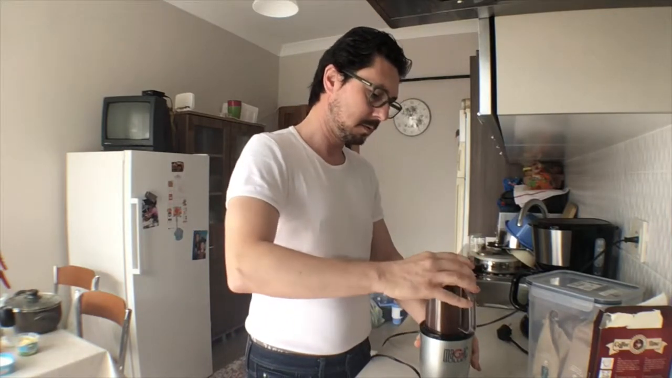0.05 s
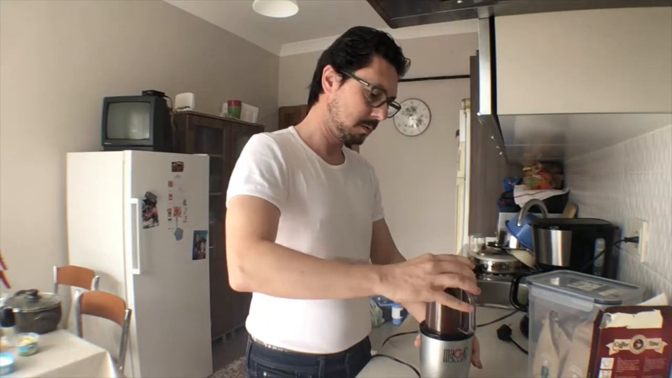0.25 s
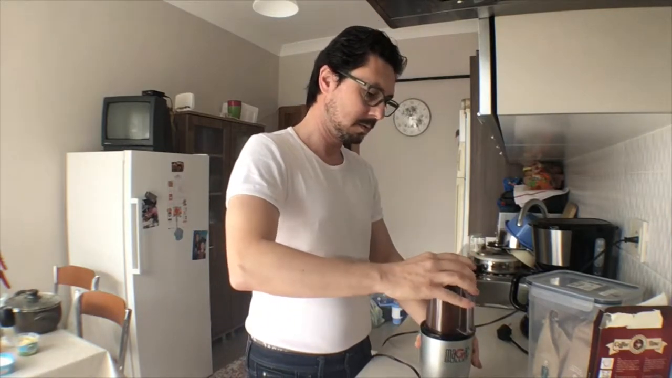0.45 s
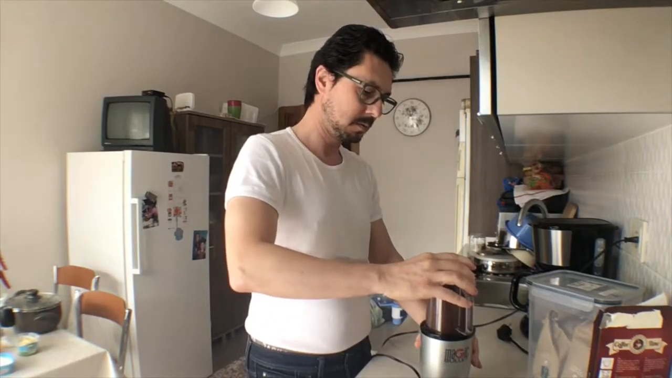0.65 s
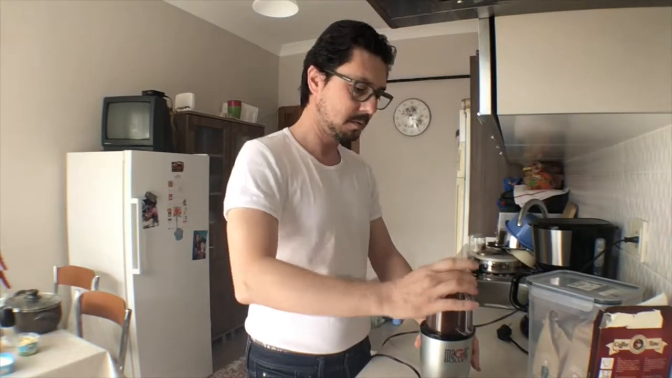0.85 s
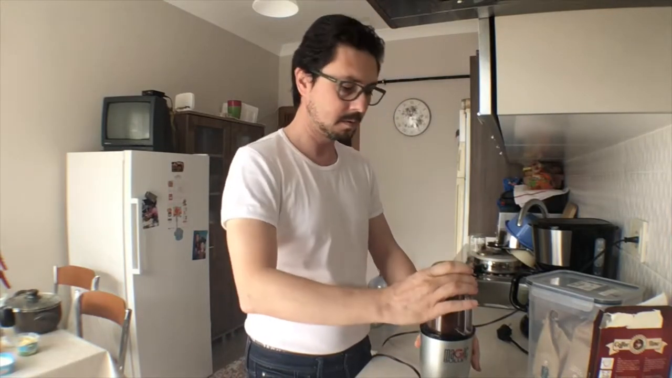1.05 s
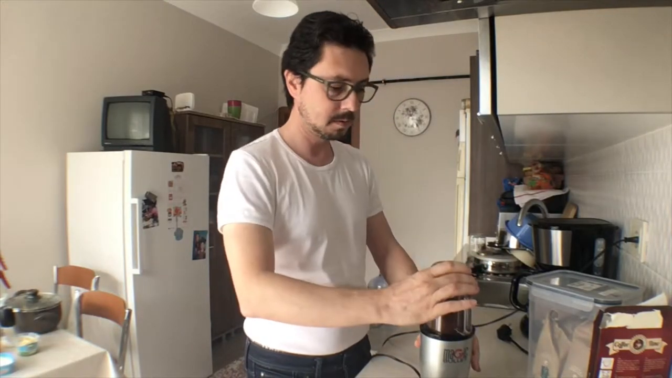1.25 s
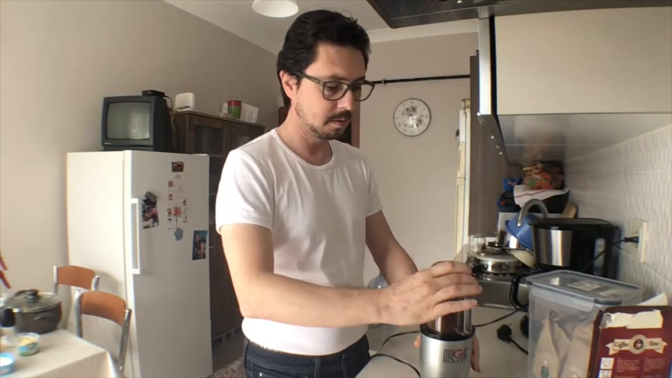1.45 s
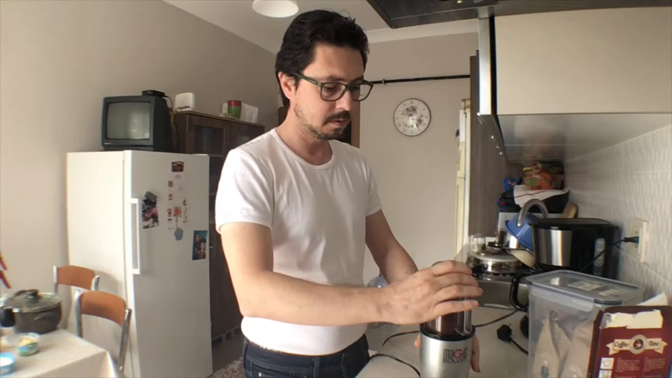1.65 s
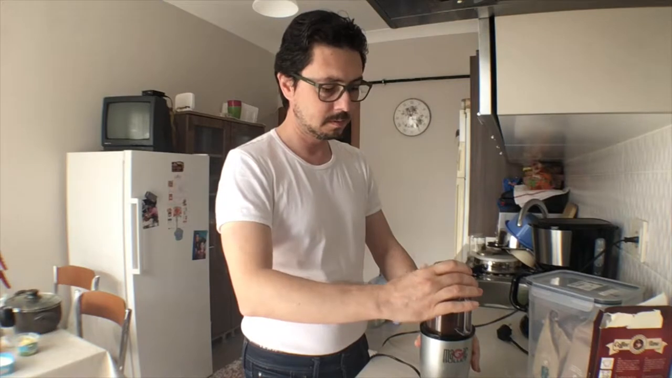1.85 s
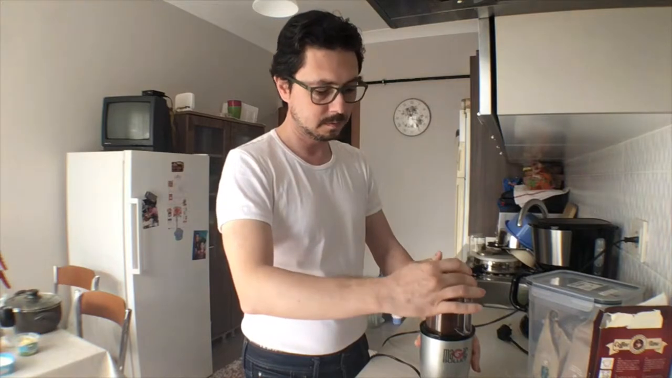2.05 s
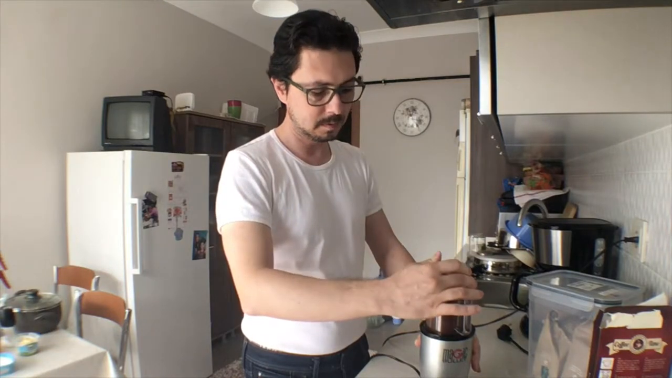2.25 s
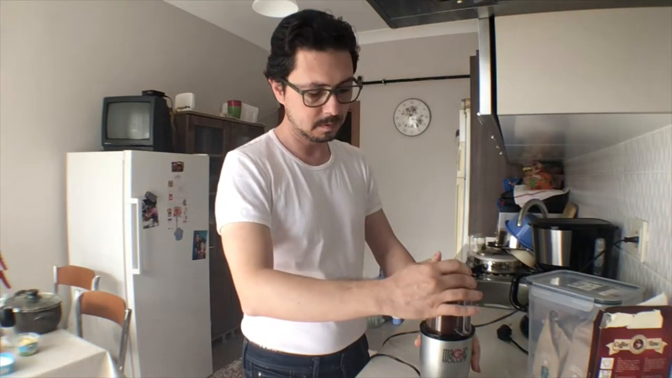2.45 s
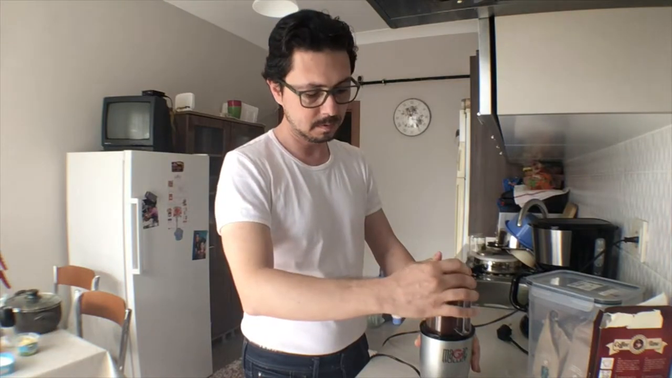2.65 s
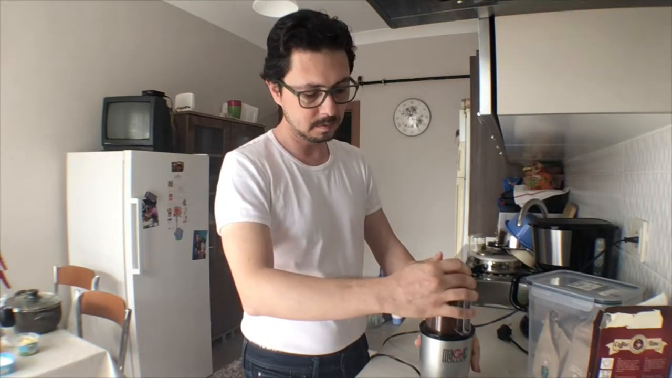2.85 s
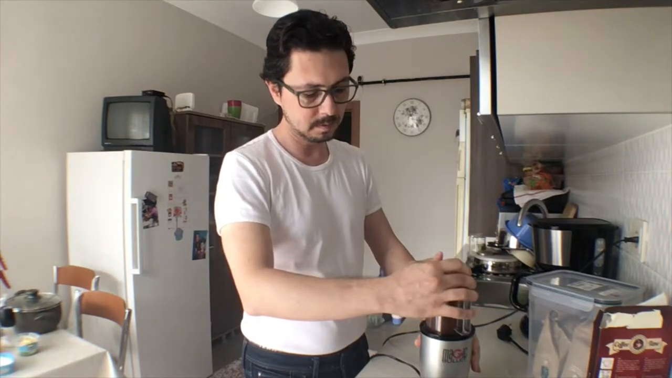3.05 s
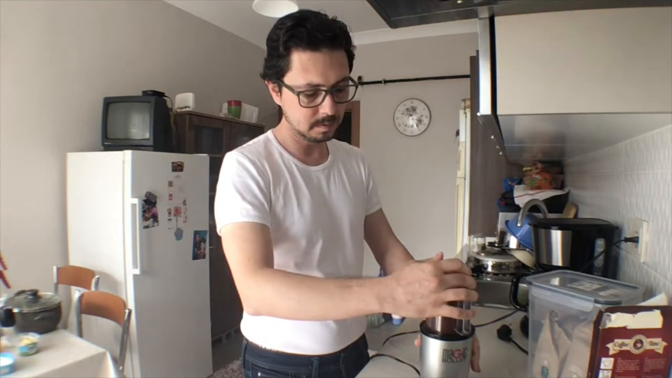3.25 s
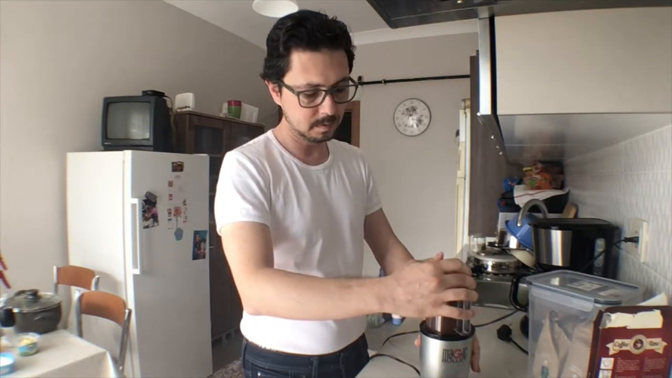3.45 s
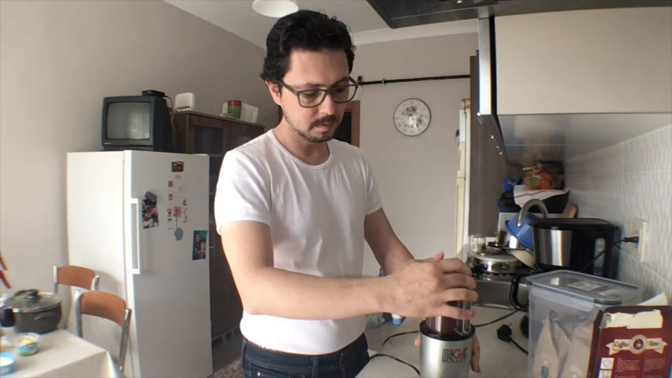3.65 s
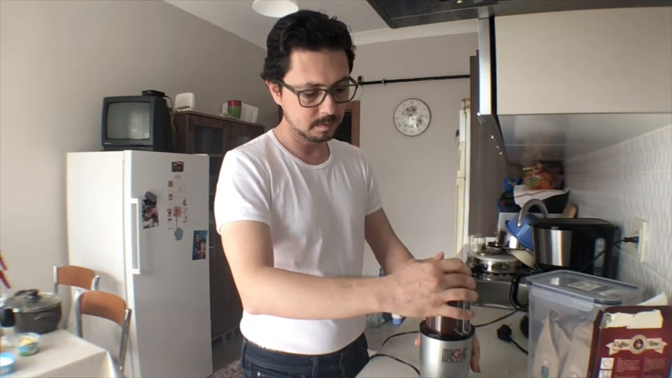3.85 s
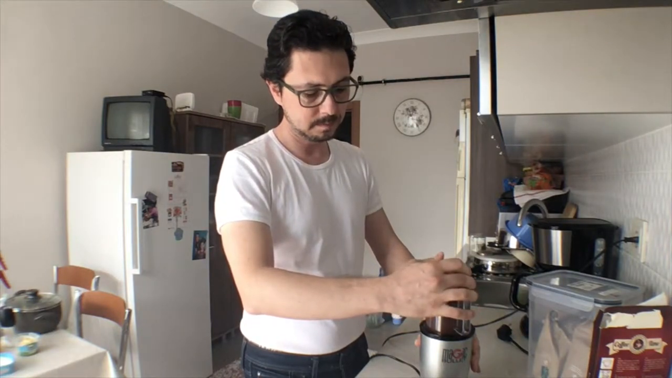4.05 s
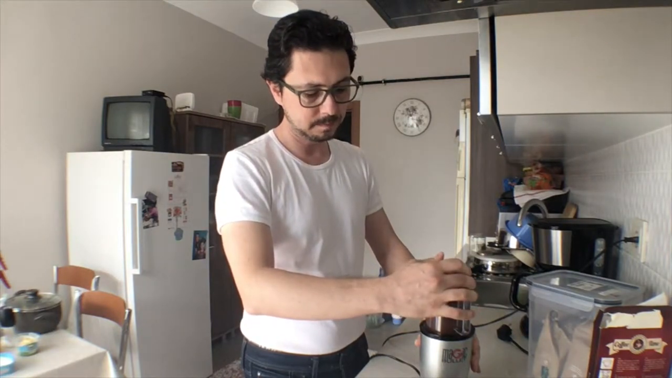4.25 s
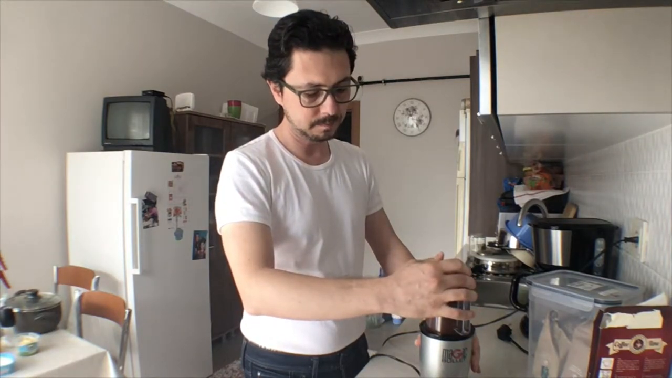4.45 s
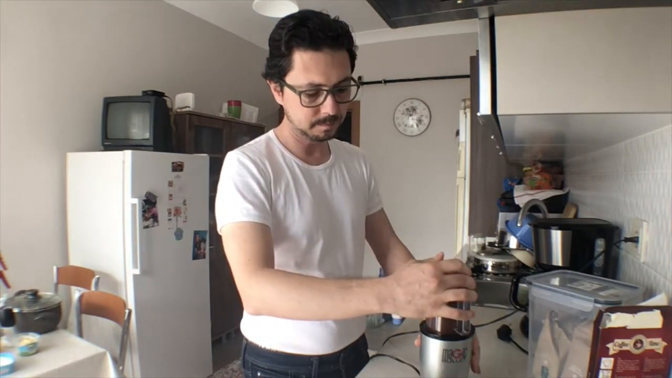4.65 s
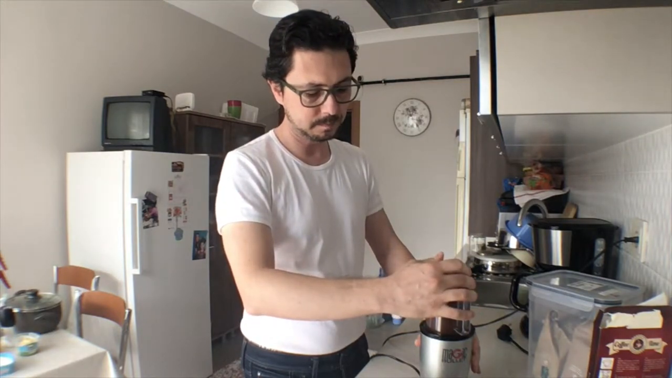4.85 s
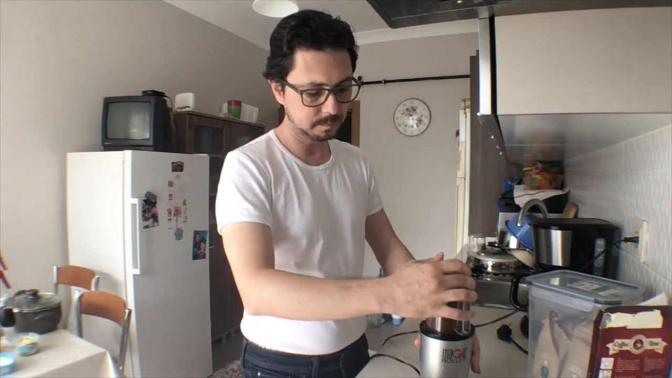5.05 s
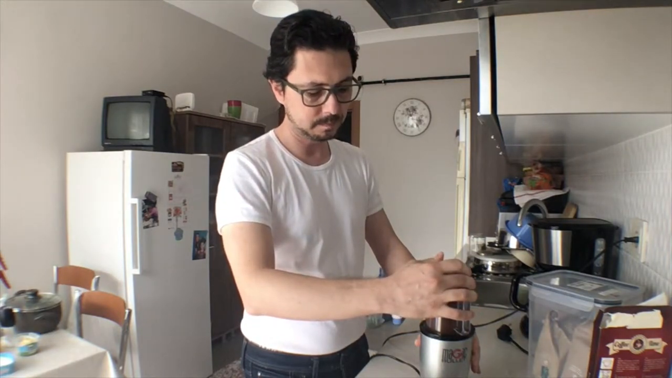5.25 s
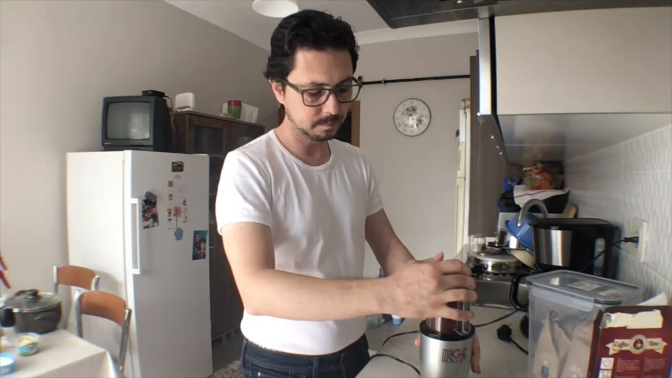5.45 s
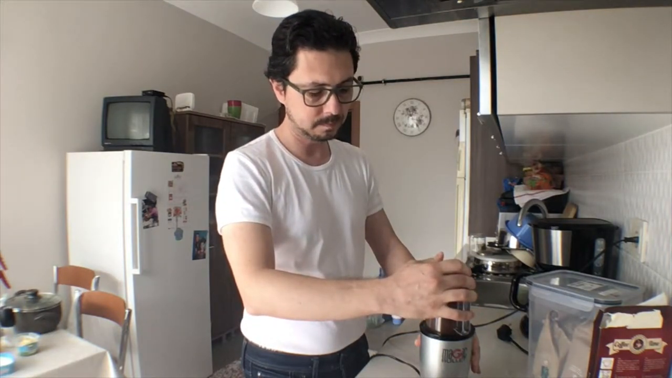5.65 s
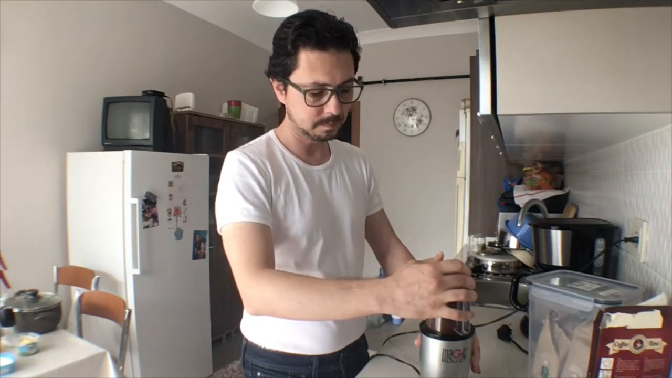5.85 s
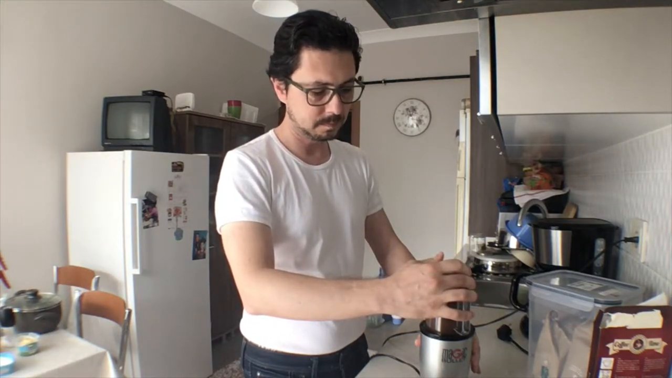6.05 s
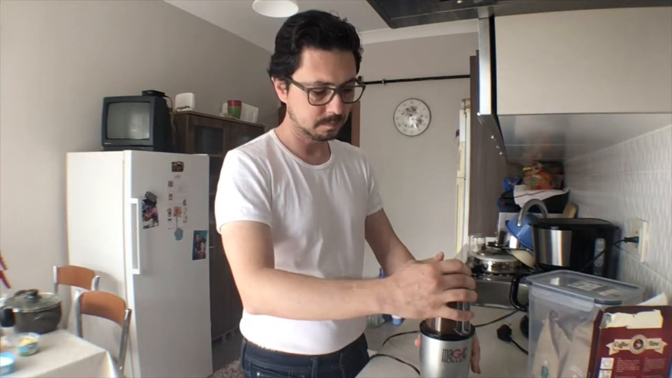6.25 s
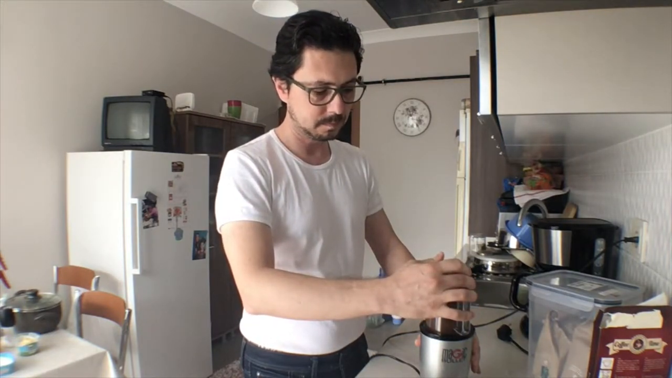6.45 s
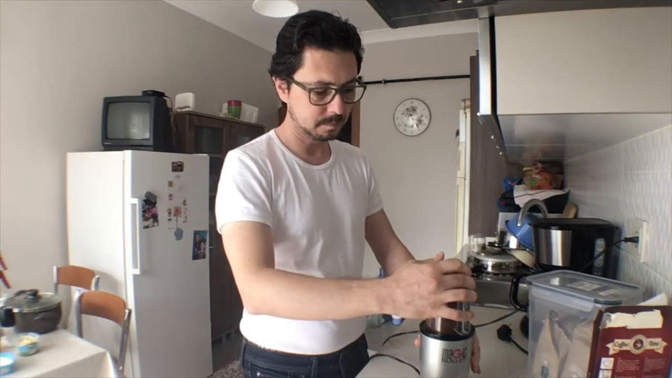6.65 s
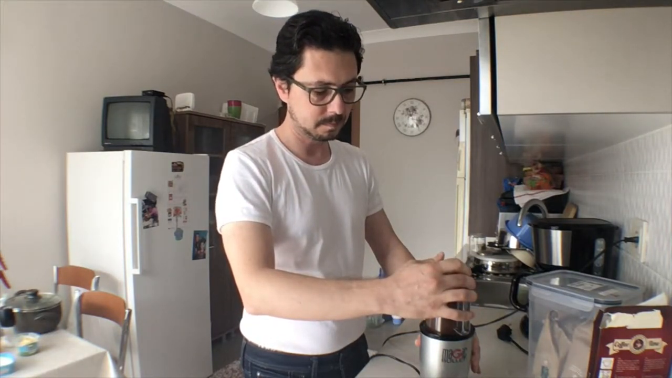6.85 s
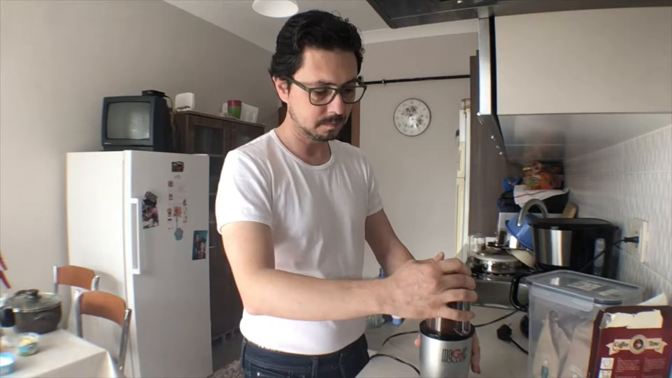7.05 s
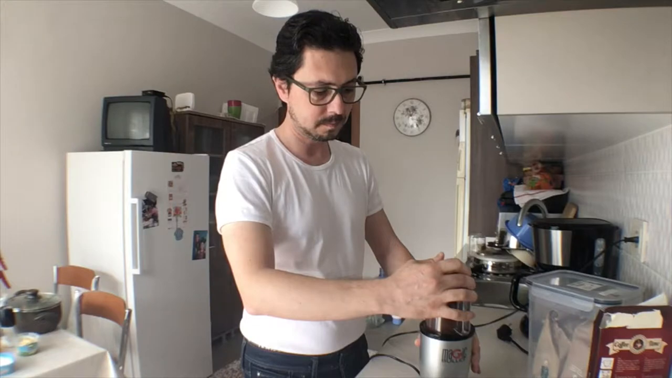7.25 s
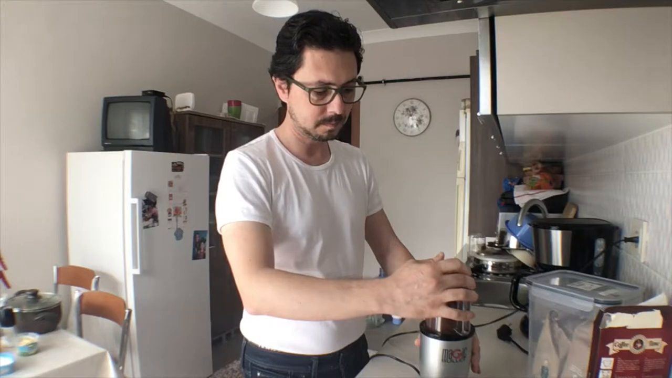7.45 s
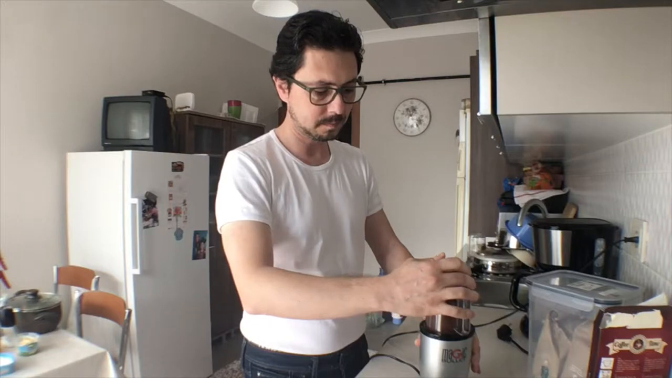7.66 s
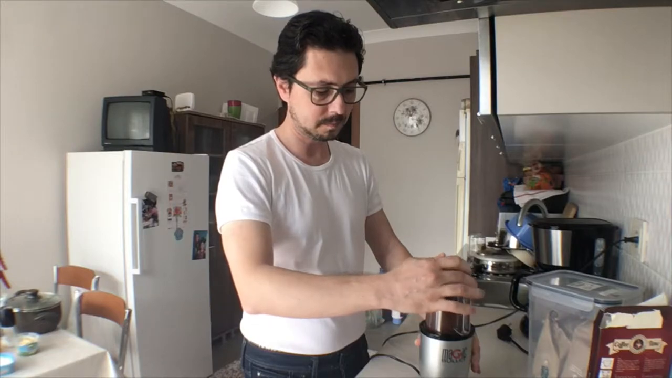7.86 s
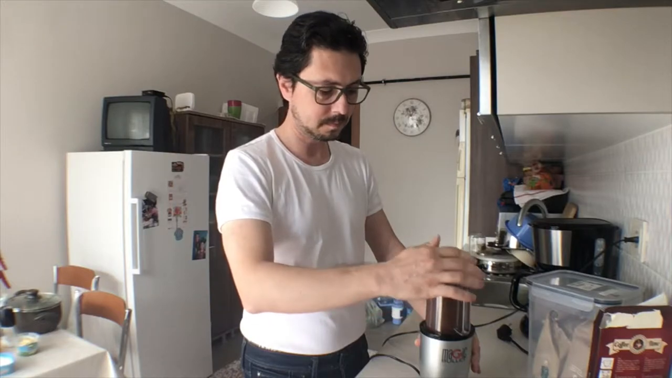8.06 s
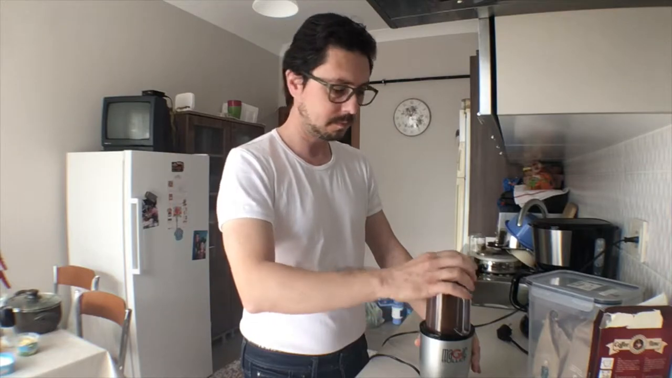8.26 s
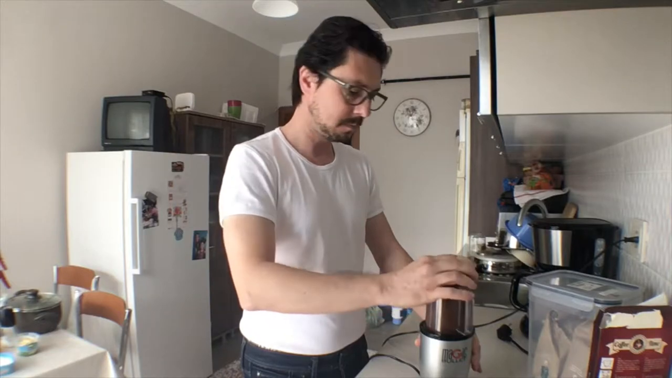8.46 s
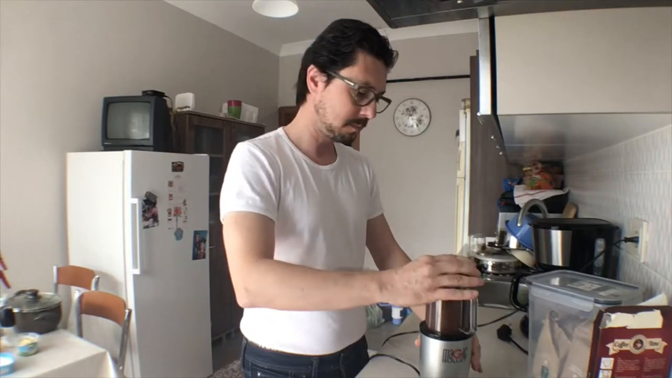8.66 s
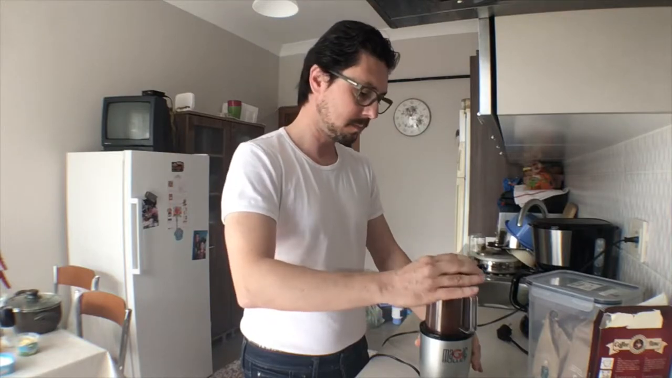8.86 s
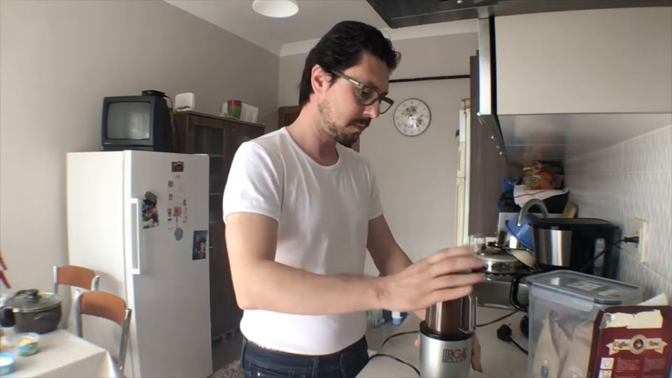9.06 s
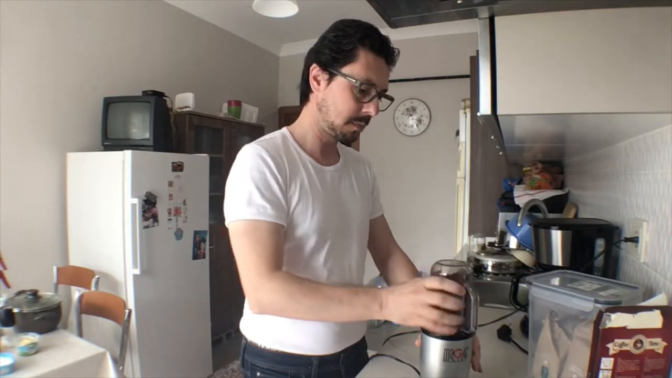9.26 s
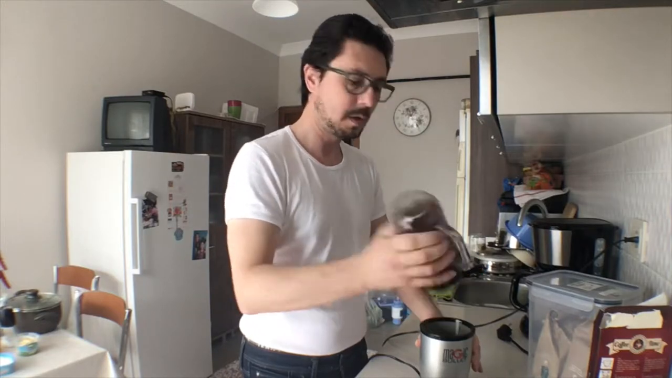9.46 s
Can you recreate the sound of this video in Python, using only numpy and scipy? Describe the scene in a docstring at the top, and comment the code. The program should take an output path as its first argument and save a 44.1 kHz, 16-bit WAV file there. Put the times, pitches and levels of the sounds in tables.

```python
"""A small blender grinds coffee beans in a plastic cup on a kitchen counter.
The switch knocks and the motor is nudged once; from 0.3 s it is held on, humming and shaking its base.
The blades shatter the beans: chips rattle in bursts, grit hisses round the wall and rings the steel.
The crunch of whole beans thins as they break. At 8.8 s the power goes off and the rotor coasts
to a stop. Last, the cup is twisted off, its lugs knocking on the base."""
import sys
import numpy as np
from scipy import signal
from scipy.fft import rfft, irfft
from scipy.io import wavfile
from scipy.ndimage import uniform_filter1d

SR = 44100
rng = np.random.default_rng(int(sys.argv[2]) if len(sys.argv) > 2 else 0)


def unload_wav(signal):
    """Save mono or channel-first audio to the path in sys.argv[1] as 16-bit WAV at rate SR, clipped to [-1, 1]."""
    wavfile.write(
        sys.argv[1],
        SR,
        np.round(np.clip(np.atleast_2d(signal).T, -1, 1) * 32767).astype(np.int16),
    )


N = 419390

# large pieces shattering: (time [s], level [dB], ping pitch [Hz], decay [s])
LARGE_CRACKS = [(0.329, -25.5, 3630, 0.012), (0.3674, -18.5, 2450, 0.014), (0.4644, -20, 3970, 0.0099),
                (0.5044, -16, 2980, 0.012), (0.7074, -15.5, 2680, 0.012), (0.8764, -17, 4460, 0.014),
                (1.0814, -22, 2090, 0.012), (1.1672, -17, 2067, 0.009), (1.2614, -21, 3690, 0.0099),
                (1.6437, -15.5, 4220, 0.016), (1.8827, -18, 1870, 0.022), (2.1435, -15.5, 2053, 0.0091),
                (2.2223, -20, 1880, 0.0092), (2.3414, -18.5, 2680, 0.012), (2.4237, -19.5, 2300, 0.014),
                (2.7462, -21, 3970, 0.012), (2.9861, -18, 2463, 0.012), (3.045, -15, 2556, 0.015),
                (3.1123, -16, 2040, 0.0085), (3.323, -20, 2060, 0.011), (3.4974, -17.5, 2620, 0.011),
                (3.6562, -16, 1860, 0.012), (3.6784, -16, 2080, 0.025), (4.0857, -16.5, 2590, 0.013),
                (4.464, -17, 2970, 0.012), (4.571, -16, 4100, 0.012), (4.7631, -20, 1910, 0.0098),
                (4.816, -19, 3650, 0.012), (4.8864, -18, 1850, 0.011), (4.9944, -17, 2670, 0.015),
                (5.2206, -19, 1870, 0.011), (5.2984, -19, 1930, 0.011), (5.463, -16, 2064, 0.02),
                (5.5679, -14.5, 2460, 0.012), (5.7823, -16.5, 3680, 0.012), (5.9549, -18, 1940, 0.013),
                (6.003, -20, 2680, 0.013), (6.135, -17, 2656, 0.012), (6.2857, -16.5, 2403, 0.012),
                (6.4467, -16.5, 2080, 0.012), (6.5364, -17, 3210, 0.013), (6.8997, -22, 1900, 0.012),
                (7.1296, -18, 2110, 0.013), (7.253, -13, 1870, 0.011), (7.2996, -17, 2580, 0.011),
                (7.5055, -19, 2680, 0.012), (7.5978, -23, 3650, 0.011), (7.886, -16, 1850, 0.012),
                (7.9808, -19.5, 3670, 0.013), (8.098, -18.5, 1833, 0.013), (8.4928, -13.5, 2120, 0.0093),
                (8.7787, -26, 1820, 0.0085)]
# load thrown by the nudge: (time [s], chips [dB], grit [dB])
NUDGE_LEVELS = [(0, -44, -54), (.021, -50.5, -61), (.026, -37.5, -40), (.042, -29.5, -41.5),
                (.06, -41, -48), (.1, -55, -73), (.16, -73, -80), (.27, -87, -97)]
# crackle from beans still whole: (time [s], share [0-1])
WHOLE_SHARE = [(0, 0.5), (.35, 0.5), (.44, 1), (.55, 0.75), (.8, 0.7), (1.1, 0.34), (1.8, 0.2), (3, 0.16)]
# contact spectra: (frequency [Hz], level [dB])
CHIP_SPECTRUM = [(200, -31), (500, -16), (800, -5.5), (1600, -2.5), (2000, 3.5), (2800, 0.5), (4200, 1),
                 (5500, -0.5), (7000, -4), (10000, -7.5), (16000, -20.5)]
GRIT_SPECTRUM = [(200, -27), (550, -3), (1000, -1.5), (2200, -1), (4000, -3.5), (5000, 0.5), (5750, -1),
                 (7300, 1), (7700, 1), (9300, 0), (10450, -6), (11400, 2), (12300, -0.5), (13000, -2),
                 (16000, -7.5)]
CRUNCH_SPECTRUM = [(300, -32), (900, -10.5), (2000, -5.5), (2900, 0), (4500, 0), (5700, -7), (7000, 0),
                   (8600, 3.5), (9600, 1), (10700, -6), (12000, 2.5), (13200, -7), (16000, -7)]
KNOCK_SPECTRUM = [(50, -1.5), (120, 4), (220, -13.5), (350, -1.5), (900, -8.5), (2000, -13.5), (4000, -17),
                  (8000, -19), (16000, -27)]
SCRAPE_SPECTRUM = [(300, -14), (2000, 9), (4000, 10), (6500, -11), (8500, 8), (11000, -4), (16000, -9)]
# cup and housing resonances: (frequency [Hz], width [Hz], lift [dB])
CUP_MODES = [(301.5, 51, 3.5), (430.5, 44, 7), (463, 19, 6.5), (638, 38, 6), (707, 29, 7.5), (849, 28, 7.5),
             (1093, 74, 4.5), (1225, 70, 6), (1390, 51, 3), (1802, 64, 3), (1883, 95, 7.5), (2070, 72, 5),
             (2130, 64, 2.5), (2445, 120, 7), (2659, 86, 8.5), (2980, 112, 7), (3180, 74, 4),
             (3460, 18, 10), (3705, 90, 8), (4054, 86, 6), (4390, 260, 4.5), (4975, 64, 7.5),
             (5360, 110, 2.5), (5850, 80, 4.5), (6180, 90, 8.5), (6410, 70, 7.5), (6860, 122, 11),
             (7070, 79, 5.5), (7690, 87, 5)]
# steel blade bending modes: (frequency [Hz], width [Hz], level [dB])
BLADE_LOW_MODES = [(5165, 80, -1), (5268, 60, 0)]
BLADE_HIGH_MODES = [(6430, 130, -2), (6655, 130, 0)]
# blade ring re grit; whole beans strike hardest: (time [s], low pair [dB], high pair [dB])
BLADE_LEVELS = [(0, -20, -22), (.33, -5, -16), (.45, -12, -8), (.58, -3, -3), (.8, -5, -1), (1, -3.5, -7.5),
                (8.1, -6, -11), (8.6, -1.5, -15), (9.0, -3, -1.5)]
# rotor spins up, races as the beans give way, steadies, coasts: (time [s], speed [rev/s])
ROTOR_SPEED = [(.33, 50), (.5, 115), (.59, 140), (.69, 160), (.82, 158), (1.0, 169), (1.2, 172), (1.5, 168),
               (2.0, 158), (3.2, 156.5), (8.2, 160), (8.77, 151), (8.95, 145)]
# hum orders 1-3: (balanced level [dB], gain at full wobble [dB])
HUM_ORDERS = [(-62.5, 19), (-61, 12), (-57, 10.5)]
# housing resonances lifting a passing order: (frequency [Hz], width [Hz], lift [dB])
MOUNT_MODES = [(339, 28, 13), (470, 14, 4.5)]
# beans lodged on one side: (start [s], end [s], strength [0-1])
WOBBLE_SPANS = [(0.562, .83, 0.94), (8.735, 8.89, 0.45)]
# switch-on surges: (time [s], buzz level [dB])
INRUSH_SURGES = [(.024, -42), (0.329, -43)]
# switch, stopping blades, cup on base: (time [s], level [dB], relative treble [dB])
KNOCK_EVENTS = [(.024, -29, -2), (0.276, -41.5, -8), (.29, -55, -15), (.316, -35, -4), (9.143, -43, -8.5),
                (9.372, -41, -10), (9.378, -51, -12), (9.387, -49, -9), (9.398, -43.5, -1),
                (9.412, -52, -12), (9.435, -52, -12), (9.448, -48, -3)]
# spectra of housing, counter and still kitchen: (frequency [Hz], level [dB])
HOUSING_SPECTRUM = [(150, -27.5), (250, -14.5), (300, -3.5), (380, 0.5), (475, -5), (510, -13),
                    (800, -11.5), (2000, -36.5), (12000, -74.5)]
COUNTER_SPECTRUM = [(25, -28), (40, -20), (48, -12), (55, -13), (63, -1), (74, 0), (89, -7), (102, -2),
                    (130, -7), (185, -10), (225, -5), (300, -15), (700, -40), (8000, -90)]
AIR_SPECTRUM = [(25, -27), (60, -3.5), (105, 4.5), (170, -16), (350, -9.5), (700, -16.5), (2000, -34),
                (6000, -41), (16000, -37)]

ON_S, OFF_S, SETTLE_S = 0.3245, 8.79, 8.966
BITE_S, BITE_RISE_S = 0.398, 0.052  # blades draw the beans in
CRUISE_HZ, MAINS_HZ = 155, 50
PING_WIDTH_HZ, PING_DB = 70, -21
KITCHEN_T60_S, CUTOFF_HZ = 0.29, 15800


def beans():
    """Chips clatter in clumps, whole beans crunch, grit streams round the wall and rings the blades."""
    chip_level, grit_level = thrown()
    whole = np.clip(in_time(WHOLE_SHARE)[0], 0, 1)
    clumps = from_db(-2 - 1.3 * whole + 1.75 * drift(28))
    chips = chip_level * clumps * impacts(per_s=4500, spread_db=2)
    grit = grit_level * from_db(-1.5 + 1.07 * drift(24)) * impacts(per_s=10500, spread_db=2.5)
    snaps = grit_level * impacts(per_s=9000, spread_db=2.5)
    coarse = body(chips + shattering(split_hz=2900), CHIP_SPECTRUM, CUP_MODES, band_hz=(1700, 4500))
    fine = body(grit * np.sqrt(1 - whole), GRIT_SPECTRUM, CUP_MODES, band_hz=(7500, 15000))
    crunch = body(snaps * np.sqrt(whole), CRUNCH_SPECTRUM, band_hz=(7500, 15000))
    low_db, high_db = in_time(BLADE_LEVELS)
    blade_low = ring(grit * from_db(low_db + 0.83 * drift(6.5)), BLADE_LOW_MODES)
    blade_high = ring(grit * from_db(high_db), BLADE_HIGH_MODES)
    return coarse + fine + crunch + blade_low + blade_high


def thrown():
    """Strength of chips and grit on the wall: the nudge, then the run, loudest on fresh beans."""
    nudge_chips, nudge_grit = from_db(in_time(NUDGE_LEVELS)) * during(NUDGE_LEVELS, fade_s=0.0063)
    chip_db = -31.5 + 6.6 * bite(fall_s=0.51)
    grit_db = -34.6 + 6.7 * bite(fall_s=0.1) + 4.5 * bite(fall_s=0.55)
    chips = from_db(chip_db) * running(attack_s=0.004, sag_db_per_s=10, fall_db_per_s=120)
    grit = from_db(grit_db) * running(attack_s=0.018, sag_db_per_s=19, fall_db_per_s=127)
    return nudge_chips + chips, nudge_grit + grit


def shattering(split_hz, size=4096):
    """Each piece bursts into a shower with a ping; heavy pieces knock low, light ones snap high."""
    t = np.arange(size) / SR
    fragments = impacts(per_s=8000, spread_db=0.7)
    low = butterworth(fragments, 3, split_hz, "low")
    high = butterworth(fragments, 3, split_hz, "high")
    showers = np.zeros(N + size)
    for time_s, level_db, ping_hz, fall_s in list(LARGE_CRACKS) + small_cracks():
        span = slice(int(time_s * SR), int(time_s * SR) + size)
        light = np.interp(ping_hz, [1900, 4300], [0.2, 0.8])
        debris = np.sqrt(1 - light) * low[span] + np.sqrt(light) * high[span]
        envelope = (1 - np.exp(-t / 0.0015)) * np.exp(-t / fall_s)
        shower = from_db(level_db - 8) * envelope / envelope.max() * debris
        ping = from_db(PING_DB) * ring(shower, [(ping_hz, PING_WIDTH_HZ, 0)])
        showers[span] += shower + ping
    return showers[:N]


def small_cracks(count=45, level_db=-23, spread_db=2, fall_s=0.009):
    """Lesser pieces break at random times and pitches; rows as in LARGE_CRACKS."""
    when, size, pitch = rng.random((count, 3)).T
    times_s = BITE_S + when * (OFF_S - BITE_S)
    levels_db = level_db + spread_db * (2 * size - 1)
    pings_hz = 1800 * 2.2 ** pitch
    return list(zip(times_s, levels_db, pings_hz, [fall_s] * count))


def bite(fall_s):
    """Extra load of fresh beans, 0-1: rises as they are drawn in, fades as they break."""
    return np.clip(since(BITE_S) / BITE_RISE_S, 0, 1) * np.exp(-since(BITE_S + BITE_RISE_S) / fall_s)


def running(attack_s, sag_db_per_s, fall_db_per_s):
    """Run envelope: rise, hold, sag at power-off, fall as the beans settle."""
    rise = 1 - np.exp(-since(ON_S) / attack_s)
    return rise * from_db(-sag_db_per_s * since(OFF_S) - fall_db_per_s * since(SETTLE_S))


def base():
    """Blade jolts shake housing and counter, most at switch-on, at low speed and on fresh beans."""
    times_s, surge_db = np.transpose(INRUSH_SURGES)
    slowness = np.clip(1 - in_time(ROTOR_SPEED)[0] / CRUISE_HZ, 0, 0.3)
    rattle = from_db(-42.5 + 5.5 * bite(fall_s=0.13) + 0.6 * drift(3))
    rattle *= running(attack_s=0.02, sag_db_per_s=38, fall_db_per_s=37)
    rattle += bursts(times_s, surge_db + 1, rise_s=0.006, fall_s=0.022)
    rumble = from_db(-59.5 + 28 * slowness + 2.5 * bite(fall_s=0.45) + 0.8 * drift(2.2))
    rumble *= running(attack_s=0.02, sag_db_per_s=11.5, fall_db_per_s=32)
    rumble += bursts(times_s, surge_db - 11.5, rise_s=0.006, fall_s=0.06)
    jolts = rattle * from_db(-3) * impacts(per_s=900, spread_db=2)
    thuds = rumble * from_db(-1.1) * impacts(per_s=770, spread_db=-0.7)
    housing = body(jolts, HOUSING_SPECTRUM, CUP_MODES, band_hz=(270, 520))
    counter = body(thuds, COUNTER_SPECTRUM, band_hz=(55, 125))
    return housing + counter


def rotor():
    """Imbalance hums on the lowest orders; the tumbling load makes speed and strength waver."""
    speed_hz = in_time(ROTOR_SPEED)[0]
    angle_rad = 2 * np.pi * np.cumsum(speed_hz * (1 + 0.008 * drift(6.5))) / SR
    wobble = sum(strength * during([(start_s,), (end_s,)], fade_s=0.055)
                 for start_s, end_s, strength in WOBBLE_SPANS)
    hum = 0
    for order, (balanced_db, wobble_db) in enumerate(HUM_ORDERS, 1):
        mount_db = resonance_db(order * speed_hz, MOUNT_MODES)
        rms_db = balanced_db + wobble_db * wobble + mount_db + 2 * drift(11)
        hum += np.sqrt(2) * from_db(rms_db) * np.sin(order * angle_rad)
    return hum * during(ROTOR_SPEED, fade_s=0.066)


def stator():
    """The iron buzzes at twice mains frequency, hardest while the rotor is still slow."""
    times_s, surge_db = np.transpose(INRUSH_SURGES)
    inrush = bursts(times_s, surge_db, rise_s=0.012, fall_s=0.07)
    steady = from_db(-64.5) * during(ROTOR_SPEED, fade_s=0.02)
    return (inrush + steady) * np.sin(2 * np.pi * 2 * MAINS_HZ * np.arange(N) / SR)


def knocks():
    """Switch, stopping blades and cup lugs: each a dull knock with a short bright scrape."""
    times_s, level_db, treble_db = np.transpose(KNOCK_EVENTS)
    dull = bursts(times_s, level_db - 6.5, rise_s=0.00028, fall_s=0.0092)
    bright = bursts(times_s, level_db + treble_db - 13, rise_s=0.0003, fall_s=0.007)
    knock = body(dull * rng.standard_normal(N), KNOCK_SPECTRUM, CUP_MODES)
    scrape = body(bright * rng.standard_normal(N), SCRAPE_SPECTRUM)
    return knock + scrape


def kitchen(x, wet_db, delay_s, size=32768, smooth_bins=15):
    """Dense reflections off tiles and cupboards lengthen the sound without colouring it."""
    t = np.arange(size) / SR
    tail = rng.standard_normal(size) * from_db(-60 * t / KITCHEN_T60_S) * (t > delay_s)
    tail = butterworth(tail / np.sqrt(np.sum(tail ** 2)), 1, [500, 11000], "band")
    room = 1 + from_db(wet_db) * rfft(tail)
    flatten = 1 / np.sqrt(uniform_filter1d(np.abs(room) ** 2, smooth_bins))
    return signal.oaconvolve(x, irfft(room * minimum_phase(flatten)))[:N]


def room_air():
    """Faint, steady low noise of the still kitchen."""
    return from_db(-62) * body(rng.standard_normal(N), AIR_SPECTRUM)


def body(force, spectrum, modes=(), band_hz=(0, SR), size=16384):
    """Broad spectrum plus resonances; unit white force gives unit power within band_hz."""
    hz = np.maximum(np.fft.rfftfreq(size, 1 / SR), 1)
    points_hz, points_db = np.transpose(spectrum)
    gain = from_db(np.interp(np.log(hz), np.log(points_hz), points_db) + resonance_db(hz, modes))
    gain /= np.sqrt(np.mean(gain ** 2 * (hz >= band_hz[0]) * (hz <= band_hz[1])))
    return signal.oaconvolve(force, irfft(minimum_phase(gain)))[:N]


def resonance_db(hz, modes):
    """Summed lift of resonance peaks at hz."""
    return sum(lift_db / (1 + (2 * (hz - centre_hz) / width_hz) ** 2)
               for centre_hz, width_hz, lift_db in modes)


def ring(force, modes):
    """Parallel narrow resonators; unit white force gives unit power."""
    ringing, power = 0, 0
    for hz, width_hz, level_db in modes:
        radius = np.exp(-np.pi * width_hz / SR)
        poles = [1, -2 * radius * np.cos(2 * np.pi * hz / SR), radius ** 2]
        mode = signal.lfilter([1, 0, -1], poles, force + 1e-18)
        ringing += from_db(level_db) * np.sqrt((1 - radius ** 2) / 2) * mode
        power += from_db(level_db) ** 2
    return ringing / np.sqrt(power)


def minimum_phase(gain):
    """Causal spectrum with these gains: nothing rings before its blow."""
    cepstrum = irfft(np.log(gain))
    half = len(cepstrum) // 2
    cepstrum[1:half] *= 2
    cepstrum[half + 1:] = 0
    return np.exp(rfft(cepstrum))


def impacts(per_s, spread_db):
    """Random tiny blows of uneven size, unit power."""
    sizes = from_db(spread_db * np.minimum(rng.exponential(1, N), 4))
    hits = rng.random(N) < per_s / SR
    return unit_rms(hits * sizes * rng.choice([-1, 1], N))


def bursts(times_s, levels_db, rise_s, fall_s):
    """Envelope that jumps at each time and decays."""
    kicks = np.zeros(N)
    kicks[np.round(times_s * SR).astype(int)] = from_db(levels_db)
    t = np.arange(SR // 4) / SR
    shape = (1 - np.exp(-t / rise_s)) * np.exp(-t / fall_s)
    return signal.fftconvolve(kicks, shape / shape.max())[:N]


def drift(corner_hz, hop=40, warmup=2000):
    """Slow random wander, unit RMS."""
    pole = np.exp(-2 * np.pi * corner_hz * hop / SR)
    noise = rng.standard_normal(N // hop + warmup + 2)
    slow = signal.lfilter([1], [1, -2 * pole, pole ** 2], noise)[warmup:]
    return np.interp(np.arange(N) / hop, np.arange(len(slow)), unit_rms(slow))


def in_time(rows):
    """One piecewise-linear curve per column after the time column."""
    times_s, *columns = np.transpose(rows)
    return [np.interp(np.arange(N) / SR, times_s, column) for column in columns]


def during(rows, fade_s):
    """Gate: 1 over a table's time span, fading to 0 outside."""
    t = np.arange(N) / SR
    return np.clip(np.minimum(t - rows[0][0], rows[-1][0] - t) / fade_s + 1, 0, 1)


def since(start_s):
    """Seconds since start_s, 0 before."""
    return np.maximum(np.arange(N) / SR - start_s, 0)


def butterworth(x, order, edge_hz, kind):
    return signal.sosfilt(signal.butter(order, edge_hz, kind, fs=SR, output="sos"), x)


def from_db(db):
    return 10 ** (np.asarray(db) / 20)


def unit_rms(x):
    return x / np.sqrt(np.mean(x ** 2) + 1e-20)


def scene():
    """Blender in its room, same in both channels."""
    air = room_air()
    contacts = kitchen(beans() + knocks(), wet_db=-4.5, delay_s=0.0018)
    mono = contacts + base() + rotor() + stator() + air
    return np.array([mono, mono])


def record(dry):
    """The microphone drops the deepest bass; the top is cut steeply."""
    thin = butterworth(dry, 4, 42, "high")
    return signal.sosfilt(signal.ellip(12, 0.1, 80, CUTOFF_HZ, fs=SR, output="sos"), thin)


dry = scene()
out = record(dry)
unload_wav(out)
```